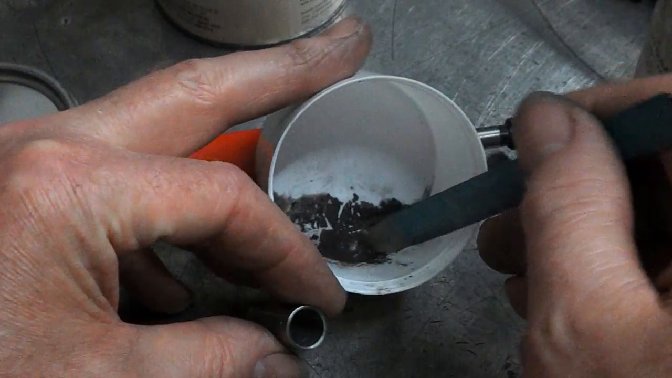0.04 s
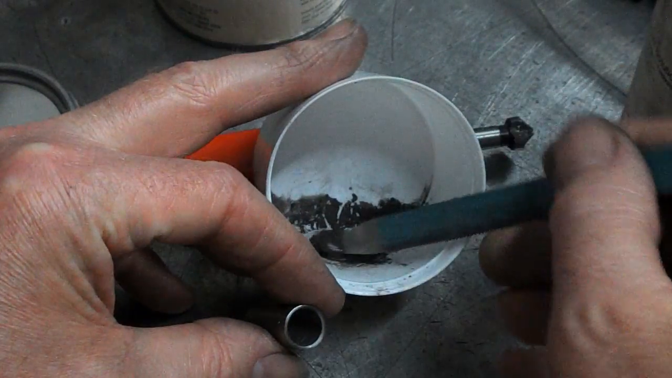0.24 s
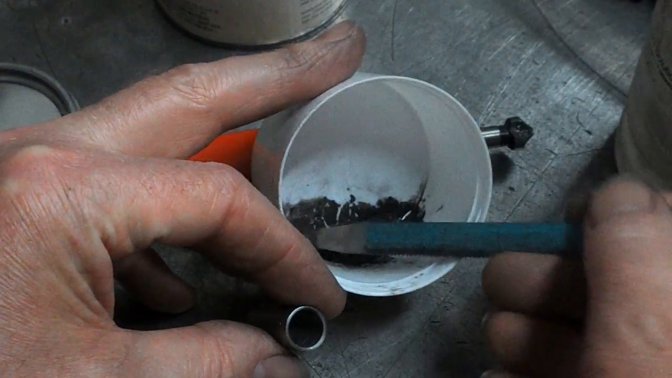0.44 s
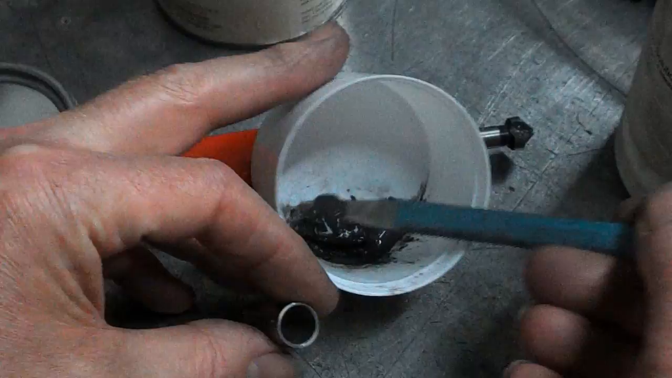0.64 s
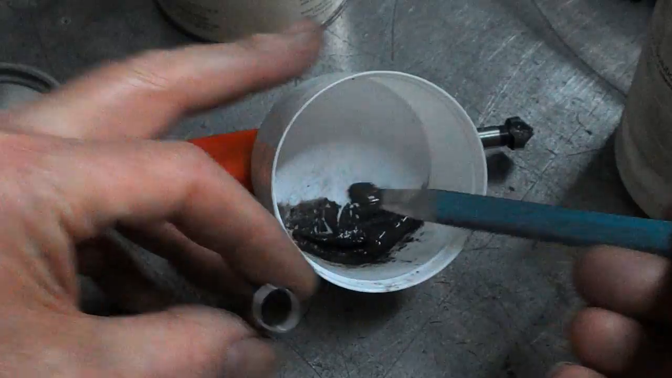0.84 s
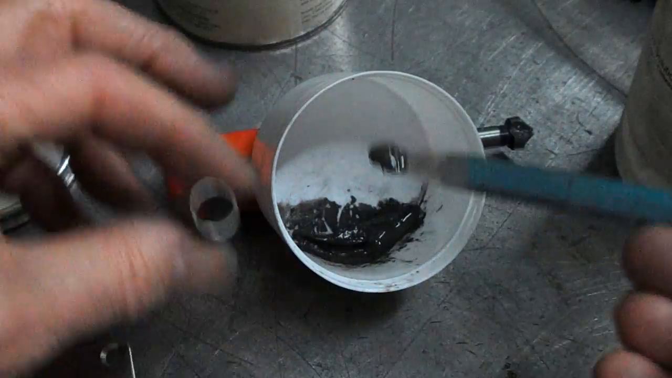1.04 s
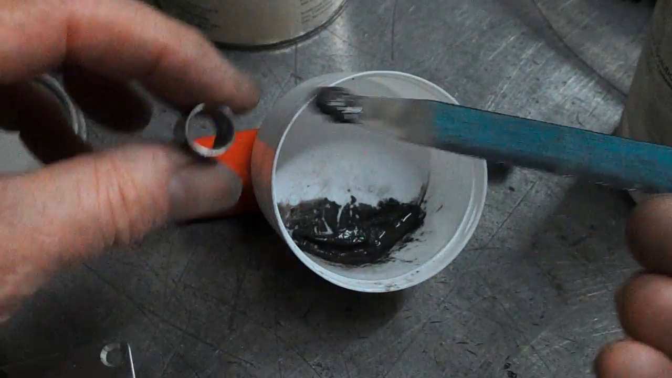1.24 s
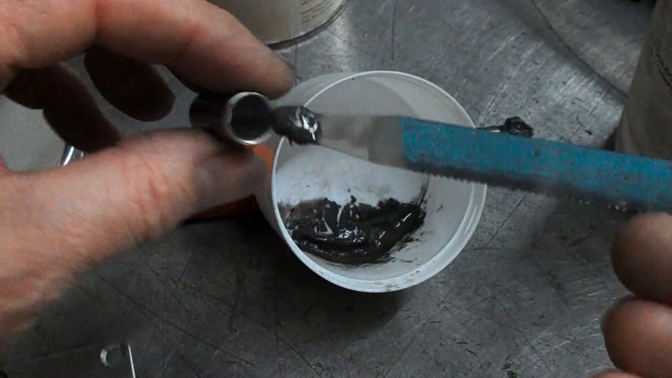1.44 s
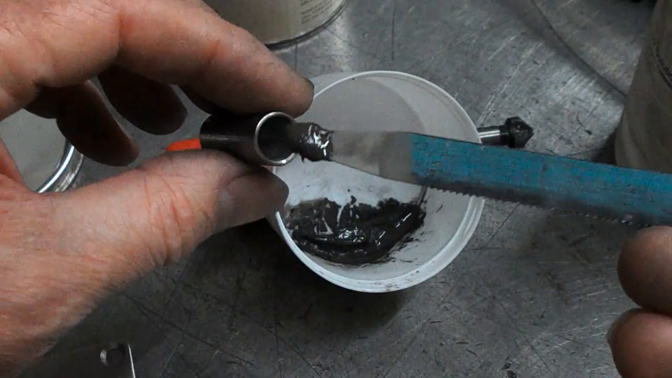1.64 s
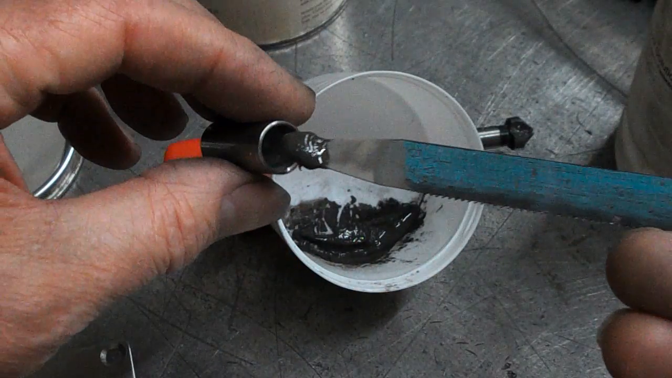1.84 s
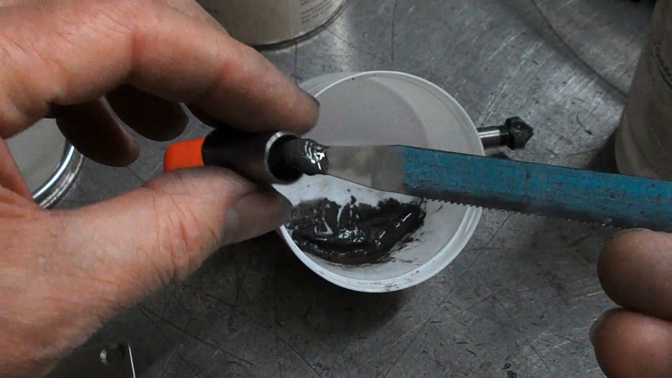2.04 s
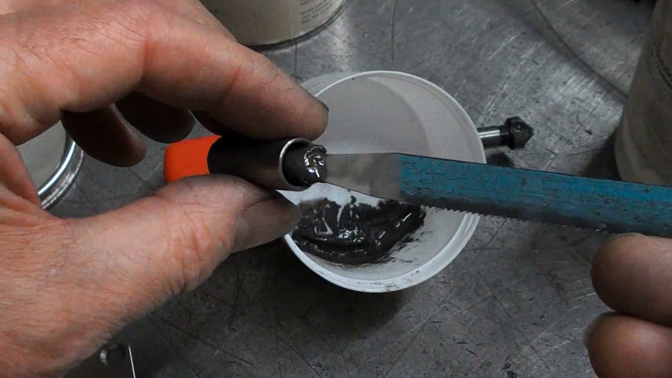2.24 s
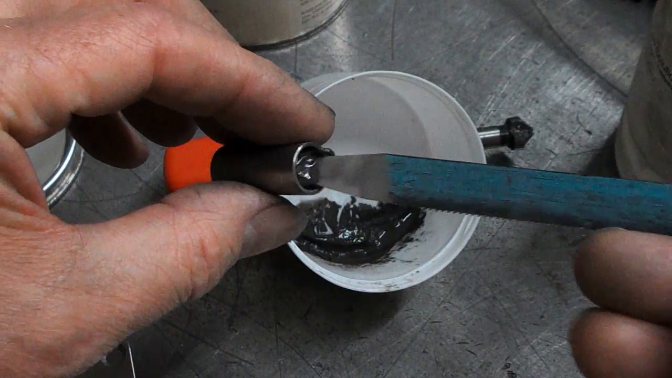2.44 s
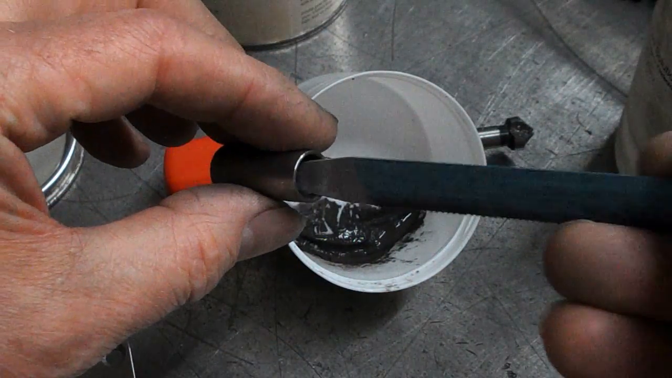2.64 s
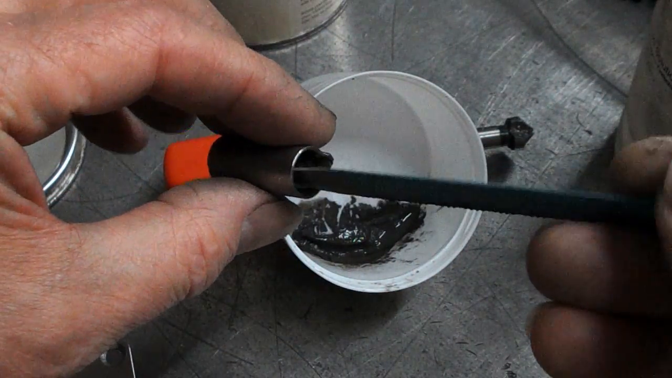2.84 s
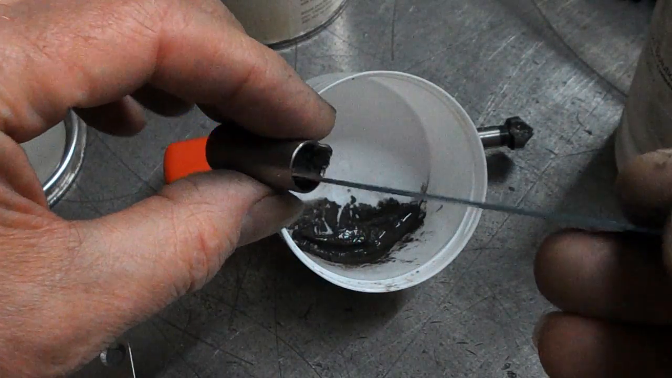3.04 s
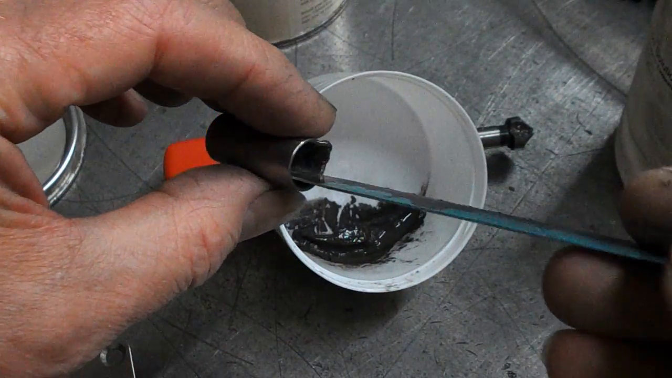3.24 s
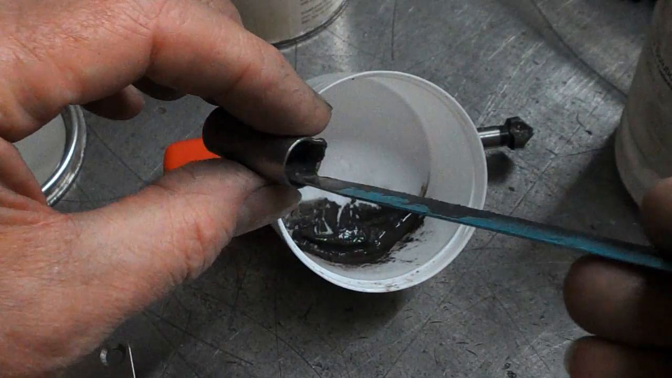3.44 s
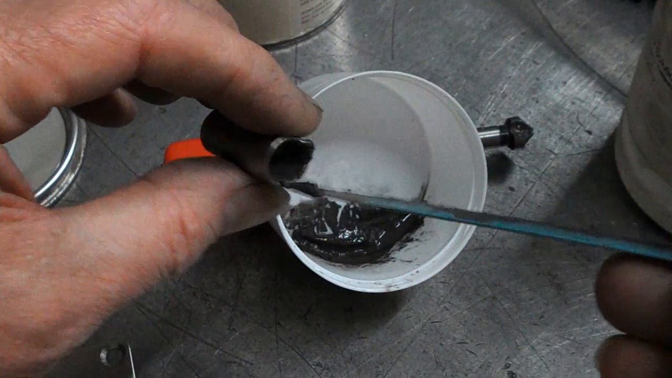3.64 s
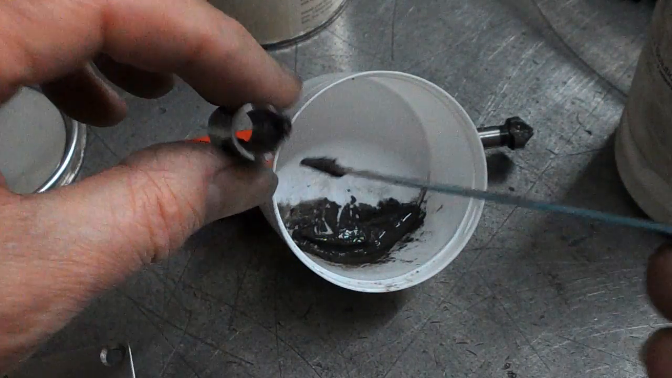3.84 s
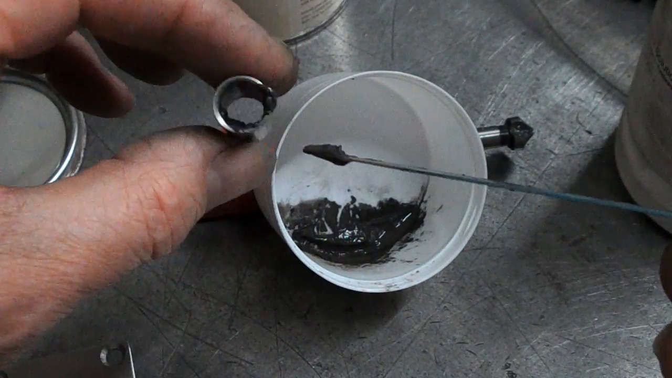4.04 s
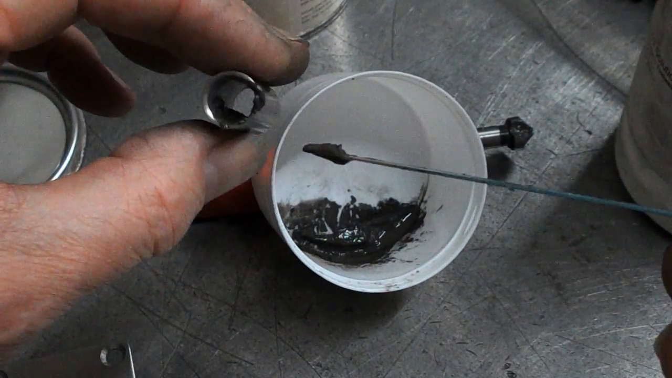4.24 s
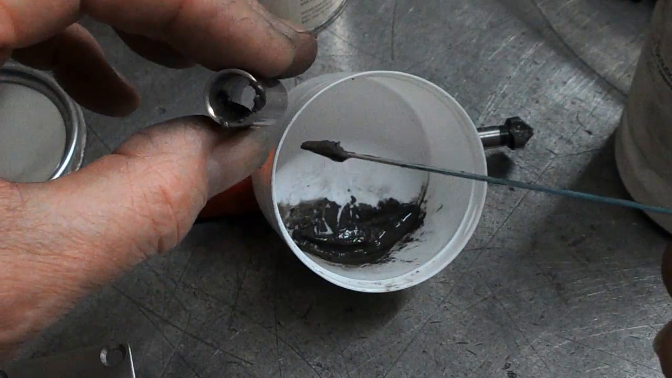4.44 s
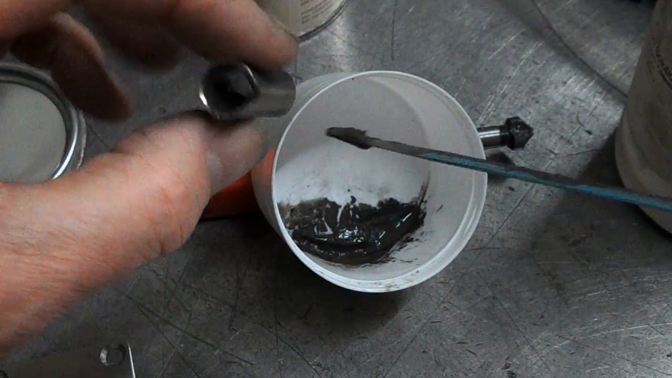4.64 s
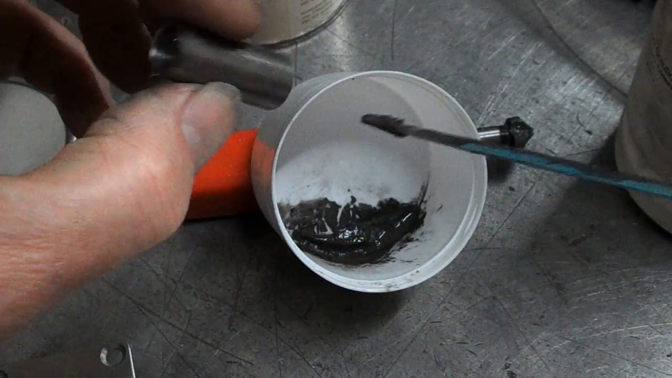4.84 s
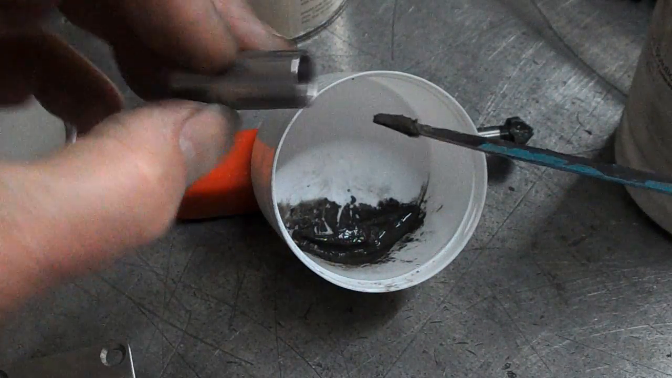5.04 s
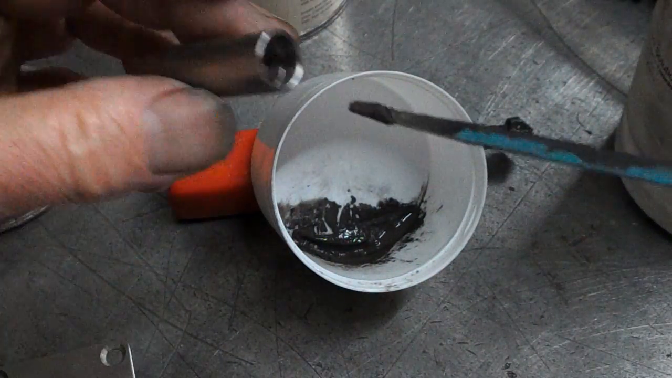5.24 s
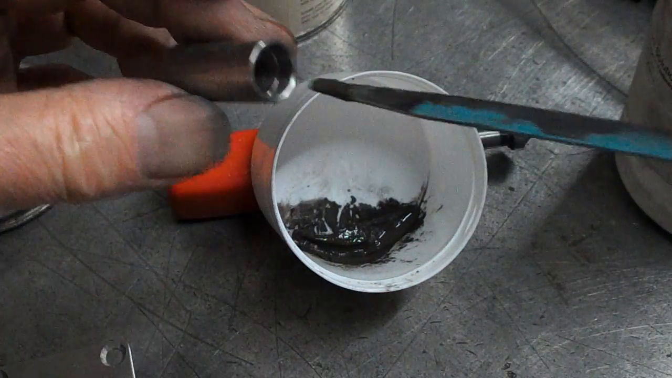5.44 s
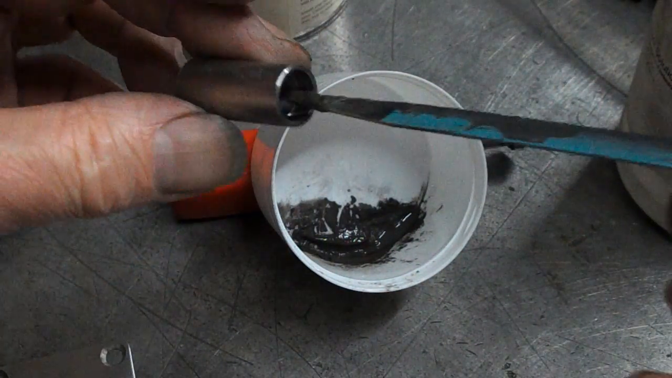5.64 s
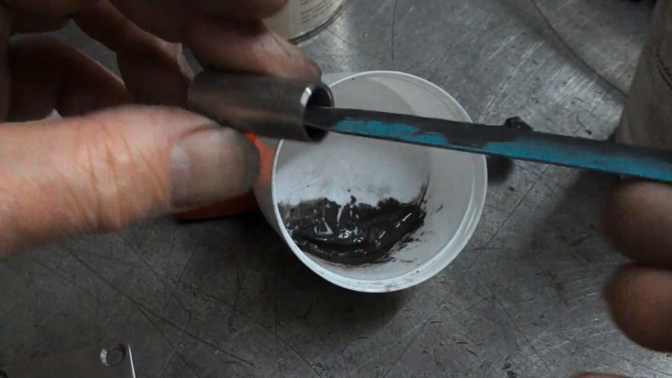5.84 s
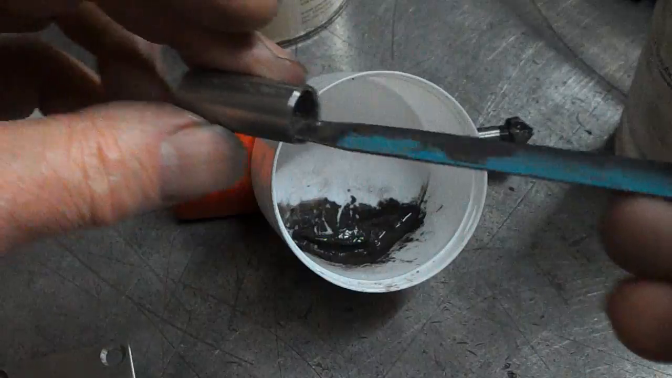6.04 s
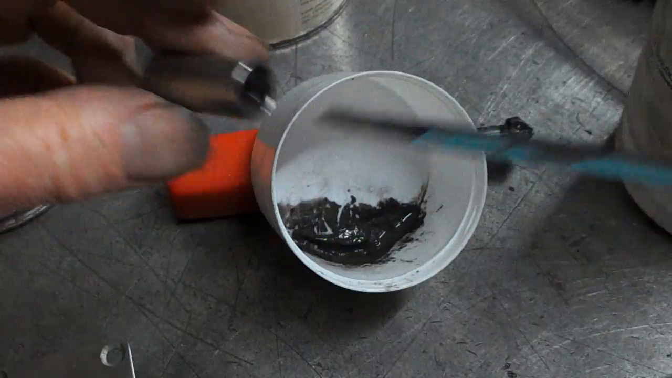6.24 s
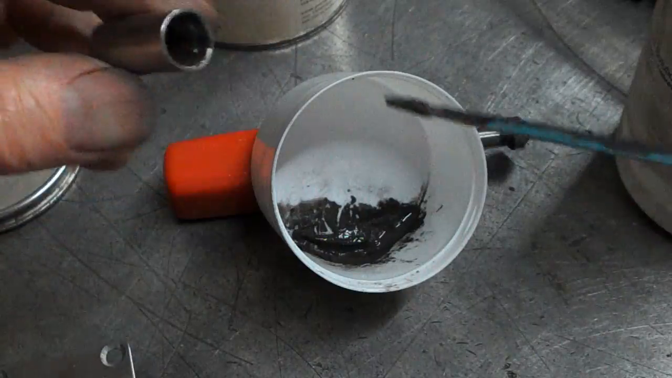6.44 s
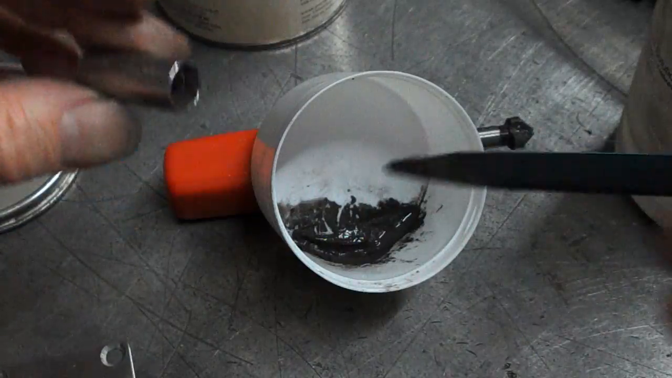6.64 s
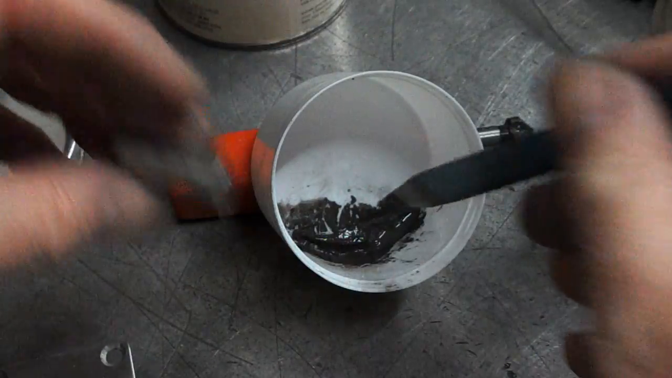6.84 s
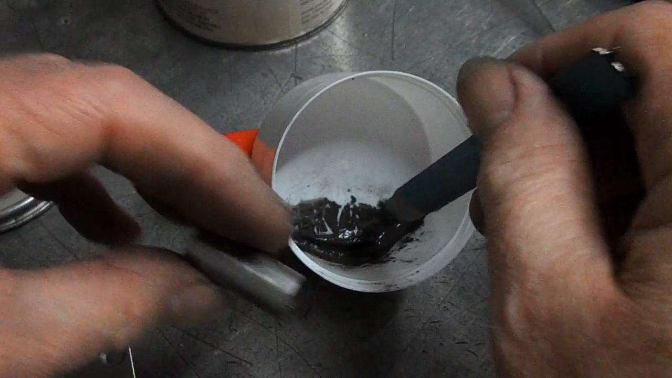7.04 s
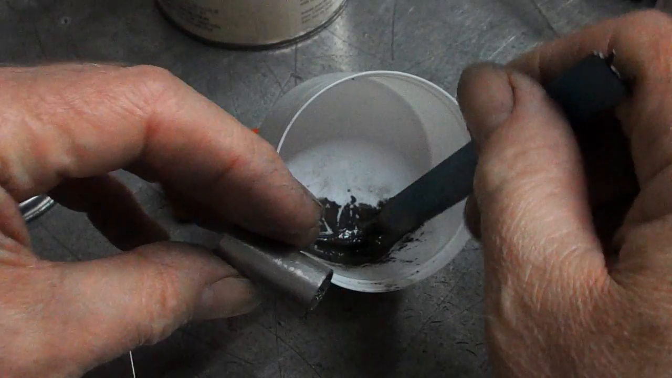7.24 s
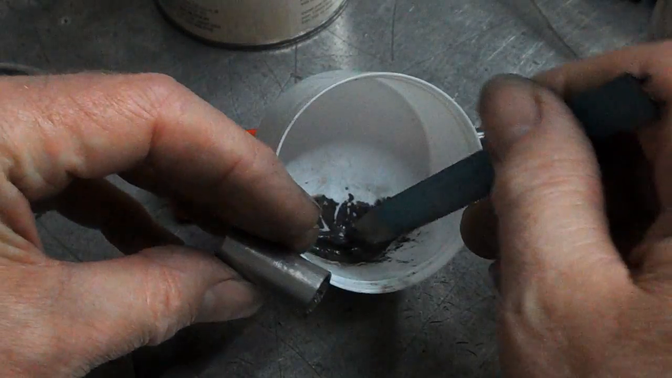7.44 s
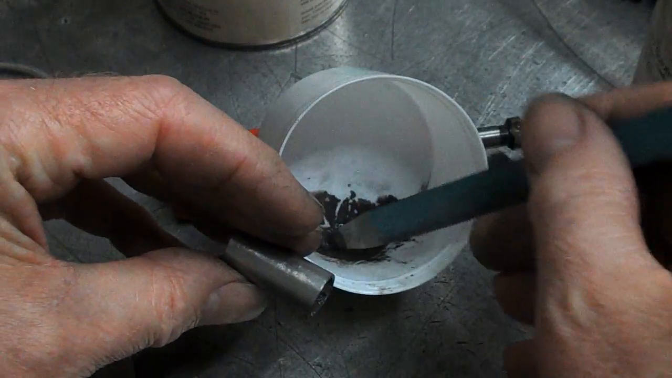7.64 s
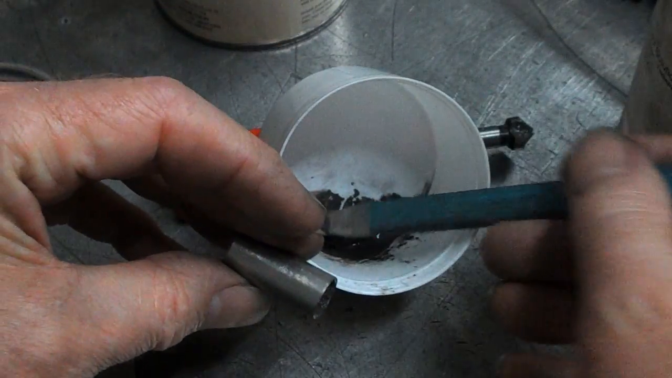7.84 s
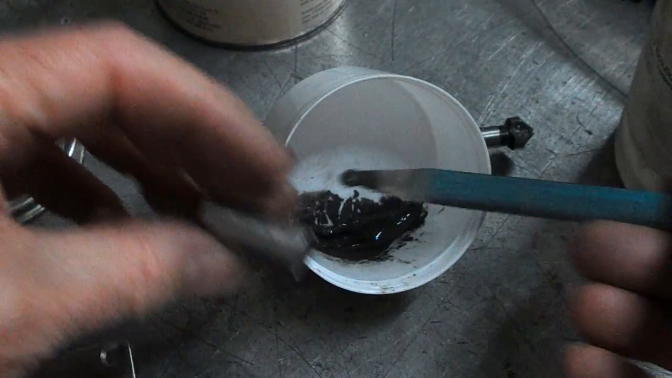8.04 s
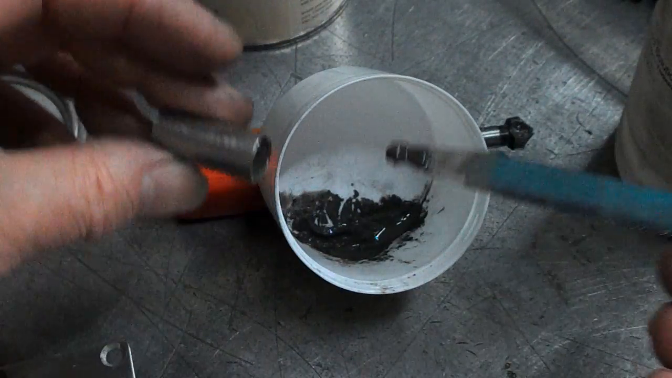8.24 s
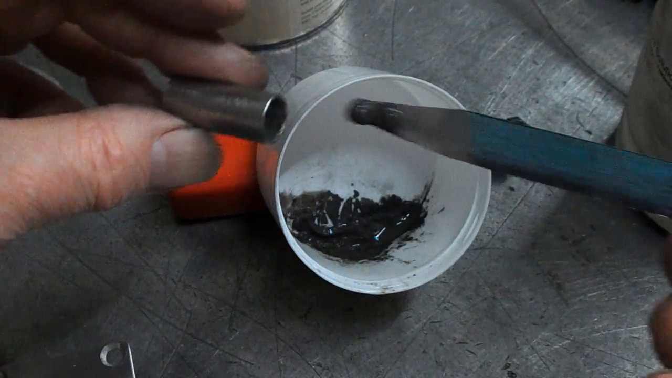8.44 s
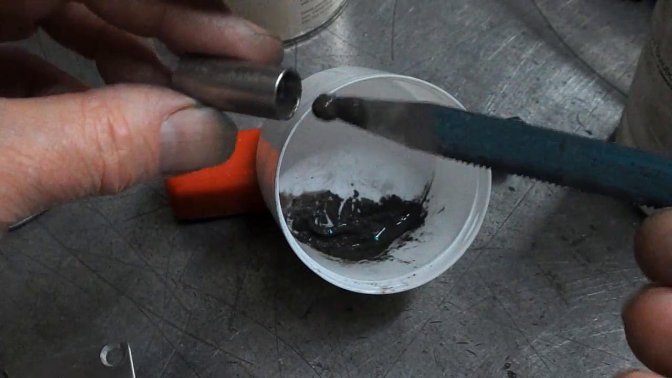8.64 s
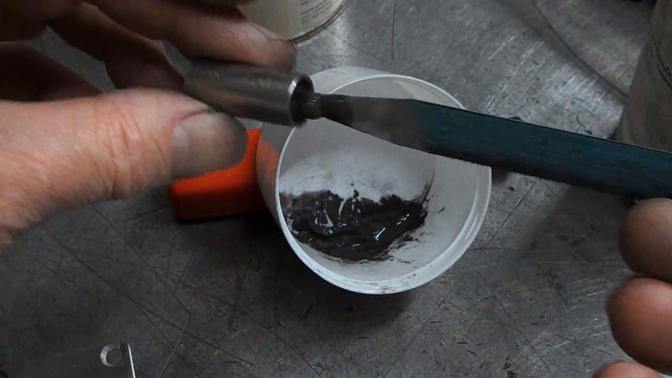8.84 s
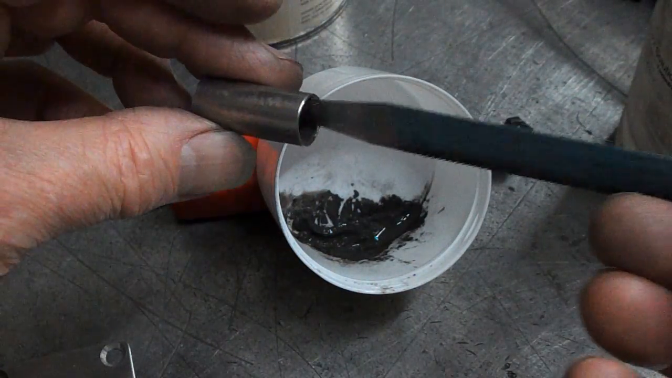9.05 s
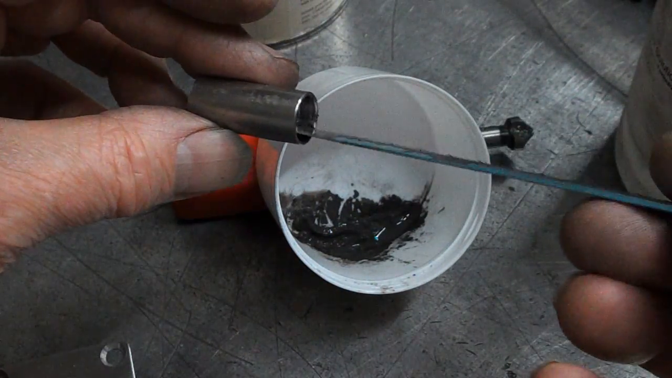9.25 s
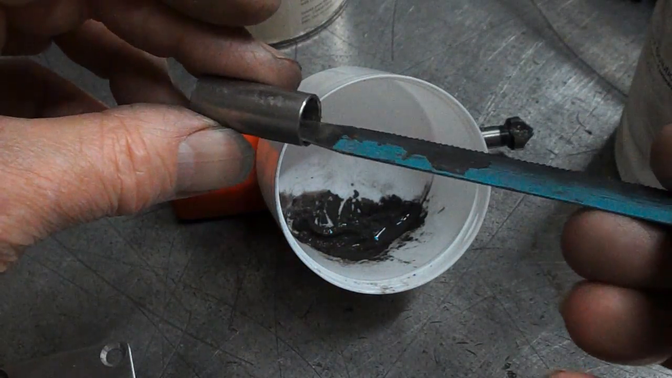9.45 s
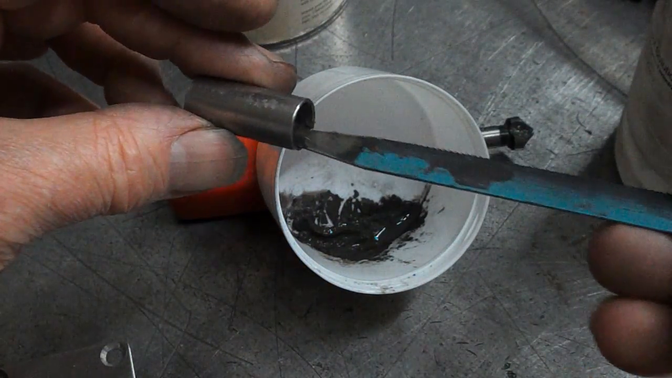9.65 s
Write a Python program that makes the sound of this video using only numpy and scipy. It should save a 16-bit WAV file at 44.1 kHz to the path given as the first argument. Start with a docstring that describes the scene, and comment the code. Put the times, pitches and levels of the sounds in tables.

```python
"""In a workshop, a thin steel blade scrapes flux paste round a plastic cup, knocks against it,
and wipes the paste into a short metal tube.
Each stroke is a run of tiny slips that ring the cup or the tube; air pockets squelch in the paste.
The room answers faintly. A close camera adds its hiss and a faint tick at every picture."""
import sys
import numpy as np
from scipy import signal
from scipy.fft import rfft, irfft, next_fast_len
from scipy.io import wavfile
from scipy.ndimage import map_coordinates

SR = 44100
rng = np.random.default_rng(int(sys.argv[2]) if len(sys.argv) > 2 else 0)


def dump(signal):
    """Clip the signal to [-1, 1] and save it as 16-bit WAV at the path in sys.argv[1]."""
    limited = np.clip(np.atleast_2d(signal).T, -1, 1)
    pcm = np.round(limited * 32767).astype(np.int16)
    wavfile.write(sys.argv[1], SR, pcm)


N = 427769

TOP_HZ = 12450  # band limit of the camera


def amp(db):
    """Decibels to gain."""
    return 10 ** (np.asarray(db) / 20)


def unit(x):
    """x at rms 1."""
    return x / np.sqrt(np.mean(x ** 2) + 1e-20)


def along(points, hz):
    """(Hz, value) points read on a log frequency axis."""
    point_hz, value = np.transpose(points)
    return np.interp(np.log(hz + 1), np.log(point_hz), value)


def filtered(x, response):
    """x times a complex response of frequency."""
    size = next_fast_len(len(x) + 4096)
    spectrum = rfft(x, size) * response(np.fft.rfftfreq(size, 1 / SR))
    return irfft(spectrum, size)[:len(x)]


def add(track, start_s, sound):
    """Mix a sound into the track at start_s, cut at the track's ends."""
    first = round(start_s * SR)
    sound = sound[max(-first, 0):]
    place = track[max(first, 0):][:len(sound)]
    place += sound[:len(place)]


def wobble(knots_per_s):
    """A smooth random curve through normally distributed knots."""
    knots = rng.standard_normal(4096)
    return map_coordinates(knots, [np.arange(N) * knots_per_s / SR], mode="wrap")


def background():
    """Steady hiss, and the camera's two-toned tick once per picture, its level slightly uneven."""
    # Room air and camera hiss. Each row: frequency in Hz, relative density in dB per Hz.
    hiss_points = [(12, -41), (20, -20), (43, -10.5), (75, -9), (103, -3), (182, -0.5), (307, -1.5),
                   (743, -6.5), (891, -7.5), (4130, -11), (5790, -10), (6950, -10.5), (7710, -11),
                   (10000, -10), (13000, -30), (22000, -120)]
    hiss_shape = lambda f: amp(along(hiss_points, f)) * (f < TOP_HZ)
    hiss = amp(-56.5) * unit(filtered(rng.standard_normal(N), hiss_shape))

    period_s, first_s, width_s = 1 / 29.99, 0.0153, 0.0011
    # seconds from the nearest tick
    offset = (np.arange(N) / SR - first_s + period_s / 2) % period_s - period_s / 2
    tones = np.sin(2 * np.pi * 5780 * offset) + amp(-1.5) * np.sin(2 * np.pi * 6830 * offset)
    ticks = tones * np.exp(-(offset / width_s) ** 2) * amp(1.3 * wobble(30))
    return hiss + amp(-69.0) * unit(ticks)


def workshop(x):
    """The room's answer: a noise tail in which each frequency dies at its own speed."""
    # Decay of the room. Each row: frequency in Hz, t60 in seconds.
    decay_points = [(200, 0.35), (800, 0.5), (2000, 0.46), (5000, 0.43), (10000, 0.12)]
    # What the walls send back. Each row: frequency in Hz, level in dB.
    wall_points = [(200, -5.5), (800, -0.5), (2000, -7), (4000, -9), (9000, -9.5)]
    hz, t, z = signal.stft(rng.standard_normal(SR // 2), SR, nperseg=256)
    decay = amp(-60 * t / along(decay_points, hz)[:, None])
    tail = signal.istft(z * decay, SR, nperseg=256)[1]
    tail = filtered(tail / np.linalg.norm(tail), lambda f: amp(along(wall_points, f)))
    gap = np.zeros(SR // 200)
    return signal.fftconvolve(x, np.concatenate([gap, tail]))[:N]


def body(modes, f):
    """Causal response of damped modes (Hz, width Hz, dB) of alternating sign."""
    total = 0
    for k, (centre, width, db) in enumerate(modes):
        mode = 1j * f * width / (centre * centre - f * f + 1j * f * width)
        total = total + (-1) ** k * amp(db) * mode
    return total


def soft(f, corner_hz):
    """Second-order low-pass: the push of a yielding contact."""
    return 1 / (1 + 1j * np.sqrt(2) * f / corner_hz - (f / corner_hz) ** 2)


def small(f, corner_hz):
    """A small thing radiates little bass."""
    return (1 - 1 / (1 + 1j * f / corner_hz)) ** 2


def contact(f, centre_hz, octaves, rest_db):
    """The place of contact drives one band best, the rest more weakly."""
    return amp(rest_db) + 1 / (1 + (np.log2((f + 1) / centre_hz) / octaves) ** 2)


def favoured(f, note_hz, boost_db):
    """The free length of the blade lifts one resonance above the rest."""
    return 1 + (amp(boost_db) - 1) * body([(note_hz, 520, 0)], f)


def friction(slips_per_s, spread_db, fine_db):
    """Contact force: sudden slips of uneven size over fine rubbing."""
    sizes = amp(spread_db * np.clip(rng.standard_normal(N), -2, 2))
    slips = (rng.random(N) < slips_per_s / SR) * sizes
    return unit(slips * rng.choice([-1, 1], N)) + amp(fine_db) * rng.standard_normal(N)


def chatter(hops_per_s, depth, life_s):
    """The blade hops unevenly: each landing presses hard and eases off exponentially over life_s."""
    gaps = np.exp(0.4 * rng.standard_normal(8000)) / hops_per_s
    landings = np.concatenate([[0], np.cumsum(gaps)])
    weight = amp(3.7 * rng.standard_normal(len(landings)))
    t = np.arange(N) / SR
    last = np.searchsorted(landings, t, side="right") - 1
    return 1 + depth * weight[last] * np.exp(-(t - landings[last]) / life_s)


def push(start, end, db, swell_db, trail_s, trail_db):
    """Phases as (start s, end s, start dB, end dB): the push, then any light trailing contact."""
    phases = [(start, end, db - swell_db / 2, db + swell_db / 2)]
    if trail_s > 0.01:
        phases.append((end, end + trail_s, db + trail_db, db + trail_db))
    return phases


def stroke(force, start, end, start_db, end_db, response, edge_s):
    """The force swells or fades and rings a body; longer strokes set in and let go more gently."""
    attack_share, release_share = 0.17, 0.21  # of the stroke's length
    length, lead = max(end - start, 0.004), 0.02  # s
    t = np.arange(int((length + 3 * lead) * SR)) / SR - lead
    ramps = edge_s + np.array([attack_share, release_share]) * length
    attack, release = np.clip(ramps, 0.001, lead)
    gate = np.clip(t / attack + 0.5, 0, 1) * np.clip((length - t) / release + 0.5, 0, 1)
    press = amp(np.interp(t, [0, length], [start_db, end_db])) * np.sin(np.pi / 2 * gate)
    grip = np.take(force, round((start - lead) * SR) + np.arange(len(t)), mode="wrap")
    sound = unit(filtered(grip * press, response)) * np.sqrt(np.mean(press ** 2))
    return start - lead, sound


def blow(response, grit, grit_t60_s):
    """A contact of peak 1: one push and a short gritty slide, through a body."""
    t = np.arange(SR // 10) / SR
    force = grit * rng.standard_normal(len(t)) * amp(-60 * t / grit_t60_s)
    force[0] += 1
    sound = filtered(force, response)
    return sound / np.abs(sound).max()


def paste():
    """An air pocket rings roughly, falling in pitch as it widens and rising as it closes."""
    # Air pockets worked by the blade.
    # Each row: start in seconds, middle pitch in Hz, glide in octaves, level in dB.
    squelches = [(.4981, 523, 1.3, -30.5), (.4997, 1250, .7, -32.5), (.812, 830, -0.48, -33.5),
                 (.825, 1330, -0.68, -29), (.829, 810, -0.11, -30.5), (.847, 720, -0.027, -40),
                 (.869, 560, -1.43, -41), (7.44, 1180, -1.15, -42.5), (7.459, 840, 0.3, -44),
                 (7.504, 587, 1.95, -38), (7.539, 1540, -0.44, -38.5), (7.553, 962, 0.5, -41),
                 (8.011, 485, 1.6, -52)]
    # length of a pocket at this level; one halving_db louder is over in half the time
    pocket_s, pocket_db, halving_db = 0.00644, -33, 12.5
    out = np.zeros(N)
    t = np.arange(SR // 20) / SR
    for start, hz, glide, db in squelches:
        length = pocket_s * 2 ** ((pocket_db - db) / halving_db)
        progress = np.clip(t / length, 0, 1)
        pitch = hz * 2 ** (glide * (progress - 0.5))
        tone = np.sin(2 * np.pi * np.cumsum(pitch) / SR)
        grain = unit(filtered(rng.standard_normal(len(t)), lambda f: soft(f, 266)))
        swell = np.abs(np.sin(np.pi * progress)) ** 0.5
        add(out, start, amp(db) * swell * (1 + 0.45 * grain) * tone)
    return filtered(out, lambda f: small(f, 127))


def squeaks():
    """Now and then the slips lock onto a single sharp mode of the blade."""
    # Squeaks of the blade. Each row: start in seconds, end in seconds, level in dB, mode in Hz.
    squeak_rows = [(0.325, 0.362, -43, 3456), (2.69, 2.74, -60, 5220), (3.366, 3.379, -52, 4850),
                   (3.46, 3.52, -60, 4850), (6.074, 6.1, -44.5, 4620)]
    fade_db = 4  # from start to end of each squeak
    out = np.zeros(N)
    force = friction(slips_per_s=1500, spread_db=-3, fine_db=3)
    for start, end, db, hz in squeak_rows:
        mode = lambda f: body([(hz, 130, 0)], f) ** 2
        add(out, *stroke(force, start, end, db + fade_db / 2, db - fade_db / 2, mode, edge_s=0.002))
    return out


def tube():
    """Blade on metal: the edge stutters on the tube, the rasp's band following the blade's note."""
    # Wipes on the tube. Each row: start in seconds, end in seconds, level in dB,
    # swell over the wipe in dB, trail in seconds, share of stutter 0-1, blade's favoured note in Hz.
    wipes = [(2.37, 2.619, -54.5, 14.5, 0, 0.75, 5800), (2.698, 2.745, -56.5, -9, 0, .3, 5000),
             (3.356, 3.424, -48, 3, 0, .4, 5700), (3.455, 3.559, -47.5, 5, 0, .7, 7600),
             (3.569, 3.649, -37.5, 4.5, .06, 0.55, 7400), (3.713, 3.727, -34.5, 1, 0, 0, 7600),
             (5.813, 5.825, -43, -1, .027, .1, 6300), (6.047, 6.106, -42, 6, 0, 0, 4700),
             (6.121, 6.215, -38.5, 3, .016, .9, 8400), (6.235, 6.247, -32.5, -3, 0, .05, 8800),
             (9.206, 9.408, -64.5, 8, 0, .6, 3570), (9.537, 9.7, -50.5, 11, 0, .5, 8300)]
    # The blade's edge catches. Each row: time in seconds, peak in dB, centre in Hz.
    catches = [(2.4924, -36, 6600), (2.697, -37, 5570), (2.979, -36.5, 4940), (3.512, -27, 7500),
               (3.638, -24, 5800), (3.69, -28, 7800), (6.085, -27, 5300), (6.152, -25, 8300),
               (6.205, -22, 8000), (6.2396, -26, 7200), (9.6087, -26.5, 7200)]
    # Tube and blade together. Each row: mode in Hz, width in Hz, level in dB.
    tube_modes = [(1420, 430, -9.5), (1890, 830, -7.5), (3240, 290, -3.5), (3870, 590, -4),
                  (4630, 510, -2.5), (5290, 190, -2), (6040, 370, -1), (6670, 270, 3), (7310, 370, 1),
                  (8120, 260, 3), (8660, 540, -2), (9330, 320, -1.5), (10120, 1160, -7)]
    # rasp_follows: octaves the rasp moves per octave of the favoured note
    rasp_hz, rasp_follows, boost_db, trail_db = 6700, 0.75, 4.5, -11
    out = np.zeros(N)
    rub = friction(slips_per_s=1600, spread_db=4.5, fine_db=0.5)
    landings = chatter(hops_per_s=170, depth=2.5, life_s=0.0013)
    for start, end, db, swell_db, trail_s, stutter, note_hz in wipes:
        force = rub * (1 + stutter * (landings - 1))
        centre_hz = rasp_hz * (note_hz / rasp_hz) ** rasp_follows
        band = lambda f: contact(f, centre_hz, 0.61, rest_db=-12.0)
        rasp = lambda f: body(tube_modes, f) * band(f) * favoured(f, note_hz, boost_db)
        for phase in push(start, end, db, swell_db, trail_s, trail_db):
            add(out, *stroke(force, *phase, rasp, edge_s=0.00081))
    for start, db, centre_hz in catches:
        ring = lambda f: body(tube_modes, f) * contact(f, centre_hz, 0.32, rest_db=-11)
        add(out, start, amp(db) * blow(ring, grit=0.23, grit_t60_s=0.0089))
    return out


def cup():
    """The blade drags over the plastic: the wall gives a hollow rustle, the steel a bright rasp."""
    # Pushes through the cup. Each row: start in seconds, end in seconds, level in dB,
    # swell over the push in dB, trail in seconds, wall over blade rasp in dB,
    # wall's note in Hz, blade's favoured note in Hz.
    pushes = [(0.0, 0.067, -46.5, -6, 0, -3, 1580, 4860), (.11, 0.175, -37, -1.5, 0.085, -10.5, 1600, 7860),
              (0.256, 0.399, -40, 2, 0, -5.5, 1250, 6100), (0.41, .465, -34, -4.5, 0.063, -11, 1400, 6600),
              (0.577, 0.624, -46, 1, 0, -27, 1000, 8550), (0.645, 0.66, -47, 1, 0, -9.5, 1000, 9100),
              (7.436, 7.449, -44.5, -5, 0.011, -4, 1410, 3950), (7.458, 7.473, -45, 4, 0, -1, 910, 5050),
              (7.48, 7.56, -45.5, 9, .02, 1.5, 1450, 5050), (7.584, 7.602, -41.5, 3, .032, -7, 1500, 4420),
              (7.727, 7.74, -48.5, 2, .045, -10, 2200, 5300), (7.777, 7.812, -46, 11, 0, -3.5, 2240, 5400),
              (7.823, 7.843, -37, 6.5, 0, -11, 1250, 5800), (7.85, 7.98, -59.5, -10, 0, -3, 1000, 4200)]
    # Knocks on the cup. Each row: time in seconds, peak in dB, hardness of the contact in Hz.
    knocks = [(.058, -28.5, 7000), (.1155, -25, 9000), (.1665, -30, 8000), (.4083, -19.5, 14000),
              (.8104, -24, 2700), (.8231, -22.5, 2900), (.8282, -18.5, 3440), (.8297, -18, 2470),
              (7.468, -30, 8000), (7.574, -37, 5000), (7.6992, -25, 6000), (7.7015, -32.5, 5930),
              (7.833, -27, 10000), (8.018, -46, 1500), (8.049, -42, 4500)]
    # Cup and blade under a stroke. Each row: mode in Hz, width in Hz, level in dB.
    drag_modes = [(298, 320, -10.5), (612, 78, -4), (830, 196, -3), (1186, 195, -3.5), (1500, 107, -3),
                  (2036, 230, -4), (2330, 230, 1), (2980, 810, -4.5), (3420, 220, 5.5), (4150, 380, 0.5),
                  (5170, 290, 2), (5490, 370, 3), (6220, 600, 2.5), (6990, 440, 3.5), (8100, 340, 1),
                  (8870, 380, 1.5), (10060, 1230, -7.5)]
    # The cup struck from inside. Each row: mode in Hz, width in Hz, level in dB.
    knock_modes = [(823, 140, -4), (1104, 66, -4), (1504, 105, 1), (1890, 390, -7.5), (2298, 117, 2.5),
                   (3120, 120, -9), (3490, 75, 3.5), (4300, 130, -2), (4930, 350, -6), (5550, 75, 6),
                   (6300, 100, 1), (6950, 160, 5), (8900, 470, 1)]
    split_hz, wall_octaves, boost_db, trail_db = 2700, 0.35, 7, -9
    out = np.zeros(N)
    force = friction(slips_per_s=1100, spread_db=1.5, fine_db=0)
    force = force * chatter(hops_per_s=230, depth=0.79, life_s=0.0032)
    force = force * amp(0.96 * wobble(45.05))  # the blade's grip wavers
    low = lambda f: soft(f, split_hz) ** 2
    high = lambda f: (soft(f, split_hz) * (f / split_hz) ** 2) ** 2
    for start, end, db, swell_db, trail_s, wall_db, wall_hz, note_hz in pushes:
        band = lambda f: contact(f, wall_hz, wall_octaves, rest_db=-1.0)
        wall = lambda f: body(drag_modes, f) * low(f) * small(f, 170) * band(f)
        rasp = lambda f: body(drag_modes, f) * high(f) * favoured(f, note_hz, boost_db)
        mix = np.array([amp(wall_db), 1]) / np.hypot(amp(wall_db), 1)
        for phase in push(start, end, db, swell_db, trail_s, trail_db):
            for share, part in zip(mix, (wall, rasp)):
                first_s, sound = stroke(force, *phase, part, edge_s=0.0043)
                add(out, first_s, share * sound)
    for start, db, hard_hz in knocks:
        ring = lambda f: body(knock_modes, f) * soft(f, hard_hz) * small(f, 390)
        add(out, start, amp(db) * blow(ring, grit=0.028, grit_t60_s=0.024))
    return out


def scene():
    """Cup, paste, tube and blade close to the microphone, in the room."""
    work = cup() + paste() + tube() + squeaks()
    return (work + amp(-8.0) * workshop(work) + background())[None]


def record(dry):
    """The camera dips one narrow treble band, rolls off and keeps nothing above its band limit."""
    # Treble roll-off. Each row: frequency in Hz, level in dB.
    roll_off = [(9500, -0.5), (10300, -0.5), (11000, -3), (11800, -6), (12400, -20)]
    notch = lambda f: 1 - 0.74 / (1 + ((f - 7680) / 150) ** 2)
    return filtered(dry[0], lambda f: notch(f) * amp(along(roll_off, f)) * (f < TOP_HZ))[None]


dry = scene()
out = record(dry)
dump(out)
```